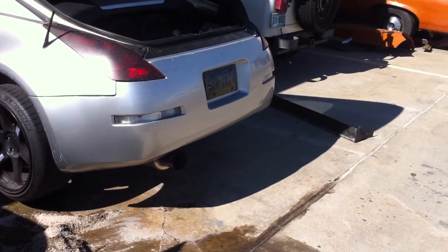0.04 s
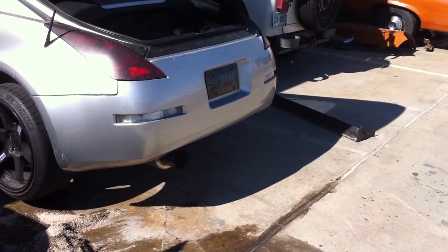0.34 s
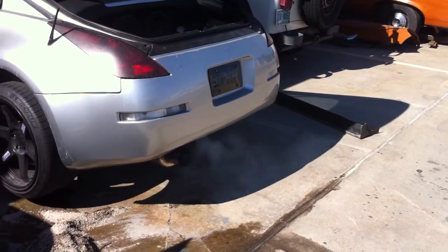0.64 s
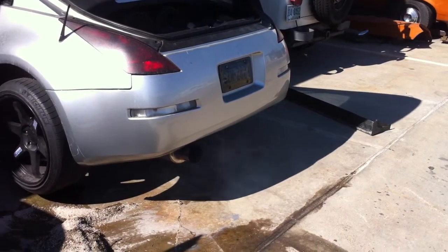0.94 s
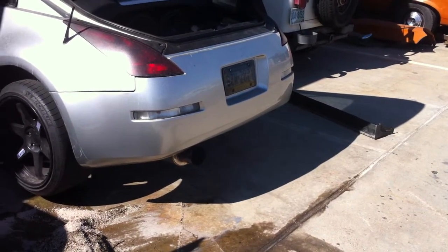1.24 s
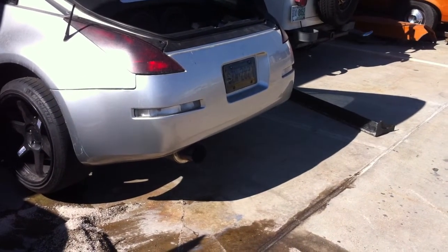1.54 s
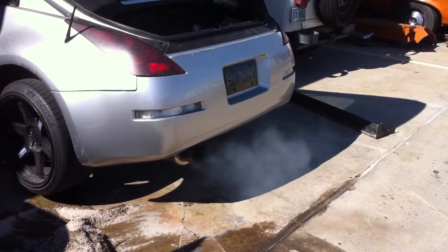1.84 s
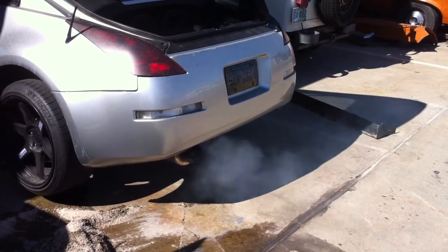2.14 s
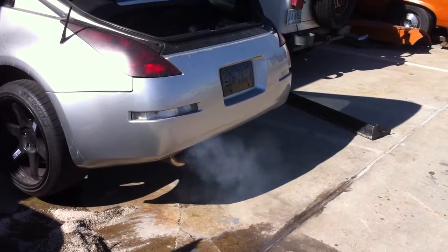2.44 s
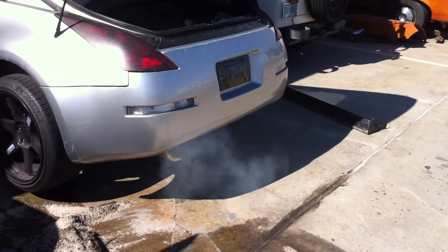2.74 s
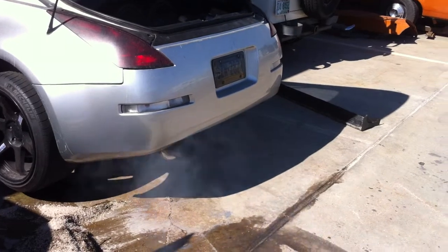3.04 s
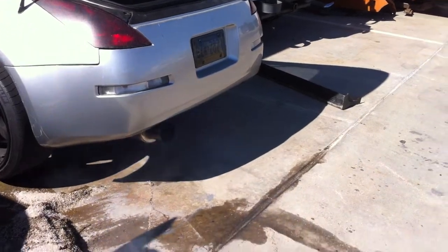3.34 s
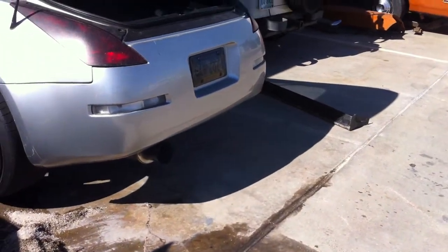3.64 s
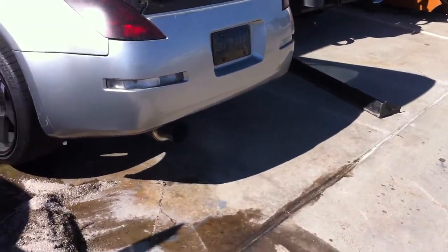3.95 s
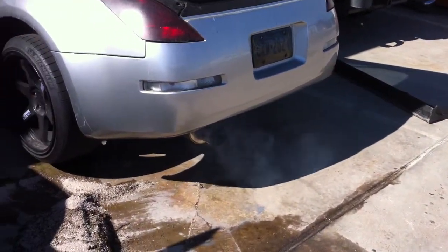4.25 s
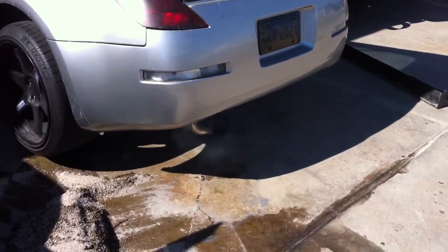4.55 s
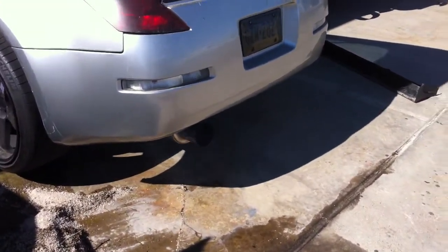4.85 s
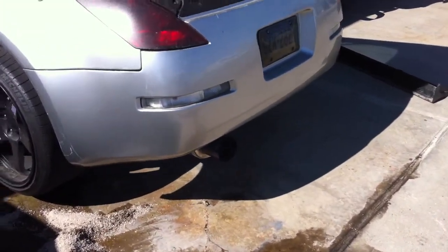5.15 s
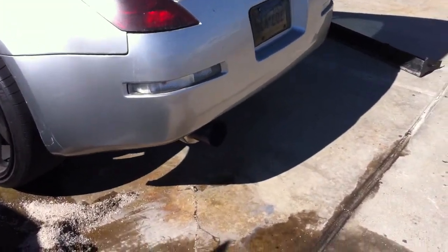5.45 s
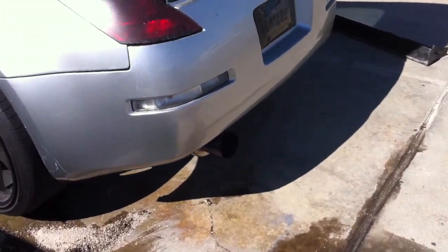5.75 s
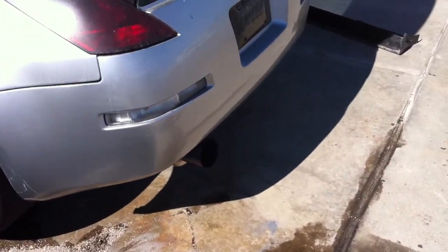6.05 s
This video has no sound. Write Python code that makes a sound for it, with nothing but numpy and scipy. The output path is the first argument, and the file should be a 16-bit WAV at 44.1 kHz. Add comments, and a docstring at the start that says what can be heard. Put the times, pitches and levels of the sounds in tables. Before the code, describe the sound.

A six-cylinder sports car is revved outdoors, heard close to its exhaust with very little echo. It opens on a hard, raspy, rising blare; at about 0.4 seconds the throttle shuts and the pipe crackles and pops. A second rev climbs from 1 to 1.5 seconds, followed by a dense run of sharp pops until 2.3. The engine then winds down with a hollow burble, swelling gently around 3.4, with one faint dry tick at 3.7, and reaches a quiet, lumpy idle just after 4 seconds. At 4.5 a quick, booming blip lifts the revs again, falling back with duller pops from 5.1 to 5.6. From 5.8 a last rev rises into a hard blare, still climbing at the end, around 6.3 seconds. A soft hiss of engine air runs underneath and swells with that final rev.

```python
"""Revving a sports exhaust

A six-cylinder car in a parking lot, heard from beside its open pipe. Each stab of throttle hardens
the cylinders' blasts into a blare, over the silencer's boom and a rush of engine-bay air. On each
lift, unburnt fuel crackles and pops. The engine coasts down to a low idle, then is blipped twice more."""
import sys
import numpy as np
from scipy import signal
from scipy.fft import rfft, irfft
from scipy.io import wavfile
from scipy.ndimage import uniform_filter1d, minimum_filter1d, map_coordinates

SR = 44100
rng = np.random.default_rng(int(sys.argv[2]) if len(sys.argv) > 2 else 0)


def wrap_up_sound(samples):
    """Save the sound to the file named by the first command line argument, as 16-bit audio."""
    columns = np.atleast_2d(samples).T
    # keep every value between -1 and 1, then stretch to whole-number steps
    tamed = np.clip(columns, -1, 1)
    steps = np.round(tamed * 32767).astype(np.int16)
    wavfile.write(sys.argv[1], SR, steps)


N = 276948
TIME = np.arange(N) / SR

# engine speed, turning where the throttle opens or shuts: t/s, firing rate/Hz
REVS = [(0.0, 238.1), (0.386, 288.6), (0.584, 265.1), (0.992, 231.9), (1.454, 296.5), (1.537, 304.9),
        (1.987, 248.3), (2.592, 185.7), (3.678, 97.06), (4.062, 68.76), (4.291, 62.5), (4.527, 93.3),
        (4.864, 178.1), (5.067, 197.2), (5.721, 157.7), (5.881, 173.2), (6.28, 274.4)]
# stabs of throttle: start/s, length/s, pressure build-up/s, bark/dB, hardness/dB, change of boom/dB,
# turbulence/0-1
THROTTLE_STABS = [(-.04, 0.43, 0.1, -14, -1.5, -8, 0.17), (1, 0.53, .09, -13.5, -1.5, -7, 0.17),
                  (3.33, 0.368, 0.25, -20, -10.5, 0, 0.47), (4.46, .13, .05, -22.5, -12, 5.5, 0.5),
                  (4.586, 0.17, .11, -12, -2, 11, 0.22), (4.744, 0.24, 0.046, -14.5, -9, -1.5, 0.23),
                  (5.77, 0.72, 0.16, -13.5, -1, -13, .21)]
# overruns, the engine running down on a shut throttle: start/s, length/s, bark/dB, hardness/dB,
# cooling/(dB/s), misfiring/0-1
LIFTS = [(0.431, .45, -17, -5.5, 23, 0.76), (1.564, 0.78, -18, -4, 15, .95), (2.302, 1.2, -29, -10, 7.5, 0),
         (5.171, 0.464, -20, -13, -2, 0.88)]
# the exhaust without load: firing rate/Hz, bark/dB, rasp/dB
COAST_LEVELS = [(62.3, -51, -49), (69.1, -34, -44.5), (99.1, -30, -32), (123.4, -30, -39),
                (170, -31.5, -40.5), (192, -28.5, -40), (237, -30.5, -38), (287, -20, -27)]
# the six cylinders in firing order: level/dB
CYLINDER_LEVELS = [2, -0.1, 0.6, -4, -0.9, -2]
# the pipe's colour on each blast: f/Hz, level/dB
PIPE_EQ = [(100, -58), (250, -1.5), (350, -2.5), (440, 2.5), (580, 1.5), (760, 4.5), (1050, -3),
           (1400, -4.5), (2000, -6.5), (2900, -17), (3900, -23.5), (4600, -19.5), (6300, -20.5),
           (8000, -30), (15000, -35)]
# the bounce off the concrete comes later as the listener steps closer: t/s, delay/ms
BOUNCE_DELAY = [(0, 1.116), (2, 1.053), (4.7, 1.184), (5.9, 1.426), (6.28, 1.54)]
# fader ride on the silencer's boom and burble: t/s, level/dB
BOOM_RIDE = [(0, -16), (.8, -16.5), (.94, -19.5), (1.56, -15.5), (1.85, -21.5), (2.29, -17.5), (2.5, -13),
             (2.97, -14), (3.51, -11), (3.62, -17), (4.02, -11.5), (4.25, -28.5), (4.49, -6.5), (4.6, -18),
             (4.65, -14.5), (4.7, -31.5), (4.78, -10.5), (5.11, -17), (5.23, -14), (5.57, -16), (5.75, -22),
             (5.81, -8)]
# low engine orders: multiple of the firing rate, level/dB
ENGINE_ORDERS = [(1.5, -23), (2 / 3, -29.5), (1, 1), (4 / 3, -28), (0, -24.5), (2, 1), (3, -3.5),
                 (3.5, -18), (4.5, -12.5), (6.5, -9)]
# the silencer's hollow resonance: f/Hz, level/dB
SILENCER_EQ = [(30, -41), (64, -55), (82, -17), (111, -16), (142, -6.5), (174, 0.5), (223, -2), (284, -1),
               (305, -7.5), (345, -16.5), (400, -20), (500, -19.5), (700, -38), (1200, -63)]
# colour of the burble: f/Hz, level/dB
BURBLE_EQ = [(25, -35.5), (60, -45.5), (95, -29.5), (135, -2.5), (200, -2), (270, 4.5), (310, -4.5),
             (350, -14), (450, -19.5), (600, -20.5), (1200, -58)]
# fader ride on the engine-bay air: t/s, level/dB
AIR_RIDE = [(0, -44.5), (1.6, -44), (2.3, -47.5), (3.65, -46), (4.25, -54.5), (4.55, -45.5), (4.9, -51.5),
            (5.25, -44), (5.7, -50), (6.28, -32)]
# colour of the rushing air: f/Hz, level/dB
AIR_EQ = [(20, -15), (70, 12), (200, 28.5), (800, 12), (2000, 9), (3200, 8), (4800, -1), (7500, 1),
          (9300, 3.5), (11500, -1.5), (14000, -1.5), (16000, -10)]
# the loudest afterfire pops: t/s, relative level/dB, sharpness/0-1
AFTERFIRE = [(0.483, -7, 0.3), (0.513, -6, 0.6), (0.534, -2, 0.6), (0.595, 5.5, 0.63), (0.641, -11, 0.39),
             (0.681, -9, 0.1), (0.751, -11, 0.8), (0.824, -7.5, 0.32), (0.839, -17, .6), (1.578, -4, 0.4),
             (1.586, -5, 0.6), (1.648, -6, 0.7), (1.732, -2, 1), (1.795, 0, 0.72), (1.815, -1, 0.82),
             (1.843, -4, 0.48), (1.906, 3, .8), (1.917, -1, 0.69), (1.938, -1.5, 0.6), (2.055, -6.5, 0.49),
             (2.069, -2, 0.81), (2.102, -2, 0.88), (2.108, 1.5, 0.7), (2.15, -1.5, 0.54), (2.157, -8, 0.5),
             (2.234, -7.5, 0.57), (2.251, -6, .4), (2.284, 3, 0.7), (5.143, -17, .1), (5.293, -15, 0.09),
             (5.328, -10.5, 0), (5.374, -8.5, 0), (5.45, -4, 0.1), (5.454, -10, 0.01), (5.503, -17, 0),
             (5.554, -21, .1), (5.596, -3, 0)]
# colour of one pop: f/Hz, level/dB
POP_EQ = [(60, -55), (170, -14.5), (300, 6.5), (450, -12.5), (740, -0.5), (1300, -2.5), (2100, -1.5),
          (3000, -8.5), (4200, -19), (6500, -17), (9000, -31.5), (15000, -23)]

IDLE_HZ = 63.6  # firing rate
BARK_RISE_SHARE, SHUT_S = 0.37, 0.063  # the bark comes before full pressure and outlasts the rasp
MISFIRE_RISE_S, MISFIRE_FALL_S = 0.079, 0.036


def amp(db):
    """Decibels to gain."""
    return 10 ** (np.asarray(db) / 20)


def follow(curve):
    """A time curve's value at every sample."""
    return np.interp(TIME, *np.transpose(curve))


def gate(start, length, rise_s, fall_s):
    """Attack, hold and release, 0-1."""
    return np.clip((TIME - start) / rise_s, 0, 1) * np.clip((start + length - TIME) / fall_s, 0, 1)


def steady(x, size=3000):
    """Levels a sound to a running rms of 1."""
    power = uniform_filter1d(uniform_filter1d(x ** 2, size), size)
    return x / np.sqrt(abs(power) + 1e-14)


def wander(hz):
    """Random drift of rms 1, rolling off above the given rate."""
    rolloff = np.exp(-(np.fft.rfftfreq(N, 1 / SR) / hz) ** 2)
    drift = irfft(rfft(rng.standard_normal(N)) * rolloff, N)
    return drift / drift.std()


def band(x, lo_hz, hi_hz, order=4):
    """Causal band-pass."""
    return signal.sosfilt(signal.butter(order, [lo_hz, hi_hz], "band", fs=SR, output="sos"), x)


def below(x, hz, order=4):
    """Zero-phase low-pass that keeps a pulse in place."""
    return signal.sosfiltfilt(signal.butter(order, hz, fs=SR, output="sos"), x)


def eq_gain(eq, hz):
    """Gain of an EQ curve at the given frequencies."""
    f, db = np.transpose(eq)
    return amp(np.interp(np.log(hz + 1), np.log(f), db))


def colour(x, eq, size=4096):
    """Minimum-phase filter shaped by an EQ curve."""
    log_gain = np.log(eq_gain(eq, abs(np.fft.fftfreq(size, 1 / SR))))
    taps = np.fft.ifft(np.exp(np.conj(signal.hilbert(log_gain)))).real
    return signal.oaconvolve(x, taps)[:N]


def clicks(at, sizes):
    """Impulses placed between samples by a short windowed sinc."""
    index = np.floor(at).astype(int)[:, None] + np.arange(-7, 9)
    offset = index - at[:, None]
    shape = np.sinc(offset) * np.cos(np.pi * offset / 16) ** 2
    return np.bincount(np.clip(index, 0, N - 1).ravel(), (sizes[:, None] * shape).ravel(), N)


def tail(x, decay_s):
    """Gives every impulse an exponential decay."""
    return signal.lfilter([1], [1, -np.exp(-1 / (decay_s * SR))], x)


def firing_rate(flywheel_s=0.125):
    """Firings a second; the flywheel rounds off every turn in the revs."""
    size = round(flywheel_s * SR)
    padded = np.pad(follow(REVS), size, "reflect", reflect_type="odd")
    return uniform_filter1d(padded, size)[size:-size]


def combustion(hz, calm_misfire=0.042, idle_turbulence=0.73):
    """Misfiring comes with the lifts; speed and throttle clean up the turbulence. Both 0-1."""
    misfire = calm_misfire
    for start, length, *_, share in LIFTS:
        misfire += share * gate(start, length, MISFIRE_RISE_S, MISFIRE_FALL_S)
    turbulence = idle_turbulence * (IDLE_HZ / hz) ** 0.32
    for start, length, build_s, *_, share in THROTTLE_STABS:
        turbulence += (share - turbulence) * gate(start, length, BARK_RISE_SHARE * build_s, SHUT_S)
    return np.clip([misfire, turbulence], 0, 1)


def firings(hz, cycles, misfire, lumpy_db=0.7, misfire_db=4.6, jitter_s=0.00002, late_s=0.00047):
    """One blast a cylinder, lumpier at idle; misfires scatter their strength and timing."""
    number = np.arange(1, int(cycles[-1]))
    at = np.interp(number, cycles, np.arange(N))
    uneven = misfire[at.astype(int)]
    scatter_db = lumpy_db * IDLE_HZ / hz[at.astype(int)] - 0.1 + misfire_db * uneven
    strength, delay = np.clip(rng.standard_normal((len(number), 2)), -2, 2).T
    sizes = amp(np.take(CYLINDER_LEVELS, number, mode="wrap") + scatter_db * strength)
    return clicks(at + SR * (jitter_s + late_s * uneven) * delay, sizes)


def blast_gains(hz, coast_edge_db=-15, stab_edge_db=-9.5, lift_edge_db=-14.5, edge_growth=2.1,
                soft_db=6.5, soften_s=0.16, shock_from=0.32, pull_db_per_oct=8, harden_db_per_oct=6):
    """Gains of low bark, mid rasp and top shock edge: coasting, stabs and lifts add in power."""
    coast_hz, bark, rasp = np.transpose(COAST_LEVELS)
    power = amp([np.interp(hz, coast_hz, db) for db in (bark, rasp, rasp + coast_edge_db)]) ** 2
    for start, length, build_s, db, hardness, *_ in THROTTLE_STABS:
        pressure = gate(start, length, build_s, min(soften_s, length / 4))
        # a stab grows louder and harder as the revs climb
        octaves = np.log2(hz / np.interp(start + length / 2, TIME, hz))
        hard_db = hardness - soft_db * (1 - pressure) + harden_db_per_oct * octaves
        shock = np.maximum(pressure - shock_from, 0) / (1 - shock_from)  # blasts steepen into shocks
        rise_s = BARK_RISE_SHARE * build_s
        fall_s = max(rise_s, min(SHUT_S, length / 4))  # a gentle stab also ends gently
        gain = amp(db + pull_db_per_oct * octaves) * gate(start, length, rise_s, fall_s)
        edge = shock * amp(stab_edge_db + edge_growth * hard_db)
        power += np.square([gain, gain * amp(hard_db), gain * edge])
    for start, length, db, hardness, cooling, _ in LIFTS:
        hard_db = hardness - cooling * (TIME - start - length / 2)
        gain = amp(db) * gate(start, length, MISFIRE_RISE_S, MISFIRE_FALL_S)
        edge = amp(lift_edge_db + edge_growth * hard_db)
        power += np.square([gain, gain * amp(hard_db), gain * edge])
    return np.sqrt(power)


def gas(blasts, turbulence, puff_s=0.0015, flow_floor=0.31, swirl=1.9):
    """Each blast drags a puff of turbulent gas behind it; the spread-out plume has a weaker bounce."""
    puffs = steady(abs(tail(blasts, puff_s)))
    noise = (puffs + flow_floor + swirl * turbulence) * rng.standard_normal(N)
    pulses = ground_bounce(steady(blasts))
    plume = ground_bounce(steady(noise), reflect=0.46)
    share = np.clip(turbulence, 0, 1)
    return colour((1 - share) * pulses + share * plume, PIPE_EQ)


def blare(blasts, hz, misfire, turbulence, edge_db=-1, misfire_db=-3, rasp_noise=1.63, edge_noise=2.54):
    """The pipe's voice: the harder the blasts come, the more rasp and shock edge they carry."""
    bark_gain, rasp_gain, edge_gain = blast_gains(hz)
    low, mid, high = (gas(blasts, share * turbulence) for share in (1, rasp_noise, edge_noise))
    bark = bark_gain * steady(below(low, 1105))
    rasp = rasp_gain * steady(below(mid, 3900) - below(mid, 1110))
    edge = edge_gain * amp(edge_db) * steady(high - below(high, 2940))
    return (bark + rasp + edge) * amp(misfire_db * misfire)


def ground_bounce(x, reflect=0.7, dull_hz=6000):
    """Direct sound plus its slightly duller bounce off the concrete, which doubles every blast."""
    delay = follow(BOUNCE_DELAY) * SR / 1000
    bounce = map_coordinates(x, [np.arange(N) - delay], order=3)
    return x + reflect * below(bounce, dull_hz, order=1)


def parking_lot(x, wet_db=-18, t60_s=0.13, echoes_per_s=2000, predelay_s=0.004):
    """Scattered reflections from concrete and parked cars."""
    t = TIME[:SR // 2]
    taps = rng.standard_normal(len(t)) * (rng.random(len(t)) < echoes_per_s / SR)
    taps *= (t > predelay_s) * amp(-60 * t / t60_s)
    wet = signal.oaconvolve(x, taps / np.linalg.norm(taps))[:N]
    return x + amp(wet_db) * band(wet, 420, 10000, order=2)


def boom_level():
    """Low-end level in dB: it thins out in the middle of a long stab and swells on the shortest."""
    level = follow(BOOM_RIDE)
    for start, length, *_, change_db, _ in THROTTLE_STABS:
        level += change_db * np.sin(np.pi * np.clip((TIME - start) / length, 0, 1))
    return level


def boom(hz, cycles, misfire, trim_db=-0.2, misfire_db=-2.5, stumble_rad=0.59, lag_cycles=0.632):
    """Low engine orders swell as they glide through the silencer's hollow; misfires make them stumble."""
    phase = 2 * np.pi * (cycles - lag_cycles) + (0.017 + stumble_rad * misfire) * wander(57)
    tones = sum(amp(db) * eq_gain(SILENCER_EQ, order * hz) * np.cos(order * phase)
                for order, db in ENGINE_ORDERS)
    flutter_db = (1.16 + 2.3 * misfire) * wander(25)
    return steady(tones) * amp(boom_level() + trim_db + misfire_db * misfire + flutter_db)


def burble(misfire, misfire_db=-3.5, bed_db=-23.5):
    """Uneven combustion stirs the silencer into a low burble."""
    stir = steady(colour(rng.standard_normal(N), BURBLE_EQ), size=1200)
    return amp(boom_level()) * (amp(misfire_db) * misfire + amp(bed_db)) * stir


def air(trim_db=-1, flutter_db=0.81):
    """Fan and gas flow hiss behind the exhaust note."""
    hiss = colour(rng.standard_normal(N), AIR_EQ)
    hiss /= band(hiss, 7060, 16000).std()  # levelled by its top end
    return amp(follow(AIR_RIDE) + trim_db + flutter_db * wander(76)) * hiss


def crackle(per_s=18, over_rasp_db=9, spread_db=3):
    """Small ignitions at random moments while the engine misfires."""
    size = sum(share * amp(db + hardness) * gate(start, length, MISFIRE_RISE_S, MISFIRE_FALL_S)
               for start, length, db, hardness, _, share in LIFTS)
    scatter_db = spread_db * np.clip(rng.standard_normal(N), -2, 2)
    return size * amp(over_rasp_db + scatter_db) * (rng.random(N) < per_s / SR)


def pops(trim_db=2, flame=0.16, flame_s=0.0019, dull_hz=2600, crackle_sharpness=0.94):
    """Unburnt fuel ignites in the pipe: a shock, sharp or dull, and a short roar of flame."""
    times, db, sharpness = np.transpose(AFTERFIRE)
    small = crackle()
    shocks = clicks(times * SR, amp(db)) + small
    sharp = clicks(times * SR, amp(db) * sharpness) + crackle_sharpness * small
    dull = below(shocks - sharp, dull_hz, order=2)
    roar = below(tail(shocks, flame_s) * rng.standard_normal(N), 3300, order=2)
    burst = colour(sharp + dull + flame * roar, POP_EQ)
    unit_peak = abs(colour(signal.unit_impulse(N), POP_EQ)).max()
    return amp(trim_db) * ground_bounce(burst) / unit_peak


def tick(at_s=3.708, gain_db=-36, decay_s=0.0077):
    """One small dry tick as the engine coasts down."""
    envelope = (TIME > at_s) * np.exp(-abs(TIME - at_s) / decay_s)
    return amp(gain_db) * band(envelope * rng.standard_normal(N), 3500, 14800, order=2)


def scene():
    """The mono mix: blare and pops echo around the lot; low end, air and tick stay dry."""
    hz = firing_rate()
    cycles = np.cumsum(hz) / SR  # one cycle per firing
    misfire, turbulence = combustion(hz)
    exhaust = blare(firings(hz, cycles, misfire), hz, misfire, turbulence) + pops()
    return (parking_lot(exhaust) + boom(hz, cycles, misfire) + burble(misfire) + air() + tick())[None]


def record(dry, ceiling_db=-3, release_db_per_s=350, smooth_samples=24, top_hz=16000):
    """A fast limiter ducks under each peak and soon lets go; a steep low-pass trims the top."""
    over_db = np.maximum(20 * np.log10(abs(dry[0]) + 1e-9) - ceiling_db, 0)
    release = TIME * release_db_per_s
    gain_db = release - np.maximum.accumulate(over_db + release)
    gain_db = uniform_filter1d(minimum_filter1d(gain_db, smooth_samples), smooth_samples)
    low_pass = signal.firwin(511, top_hz, window=("kaiser", 9), fs=SR)
    return signal.oaconvolve(dry * amp(gain_db), low_pass[None], "same")


dry = scene()
out = record(dry)
wrap_up_sound(out)
```